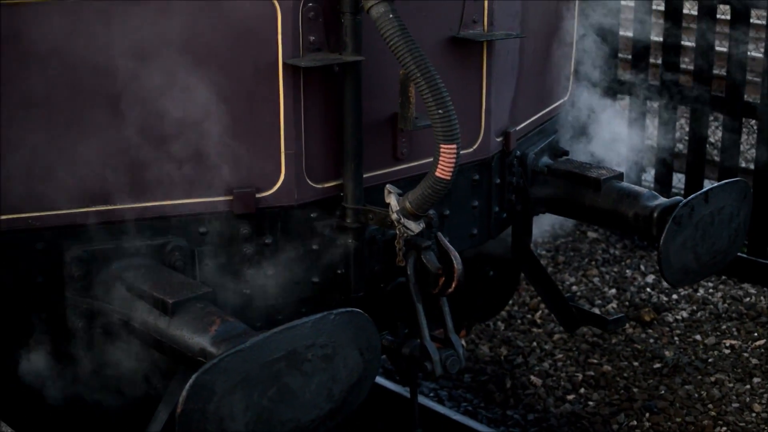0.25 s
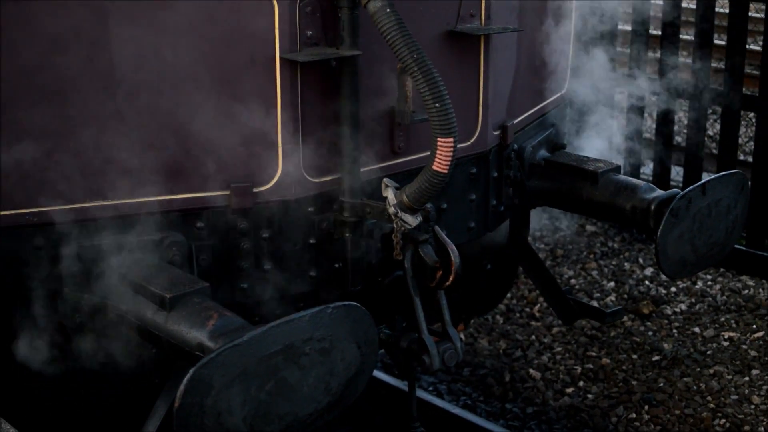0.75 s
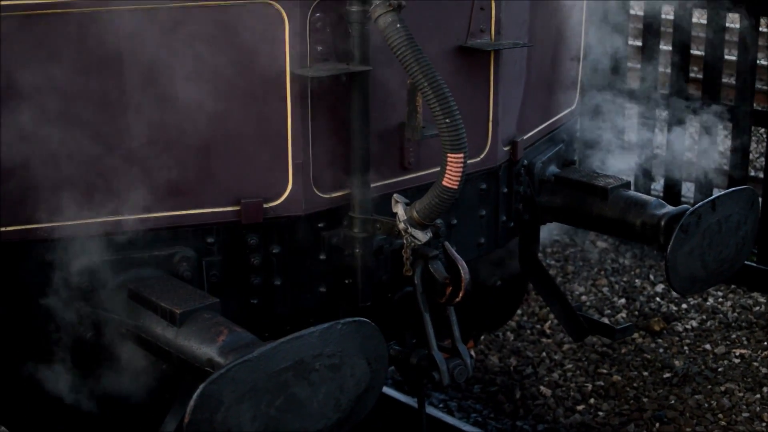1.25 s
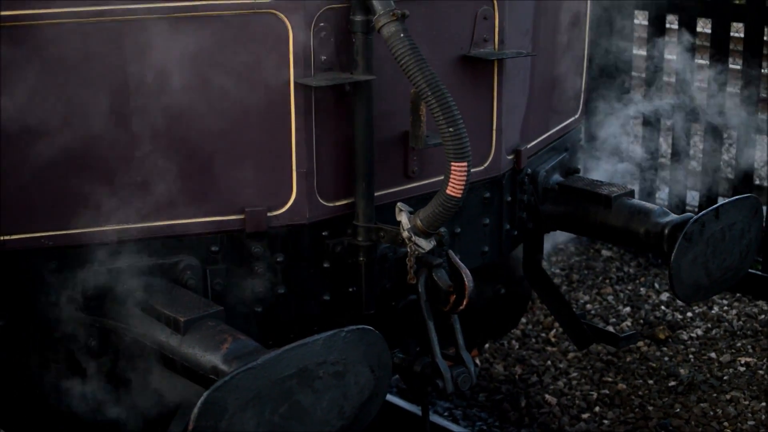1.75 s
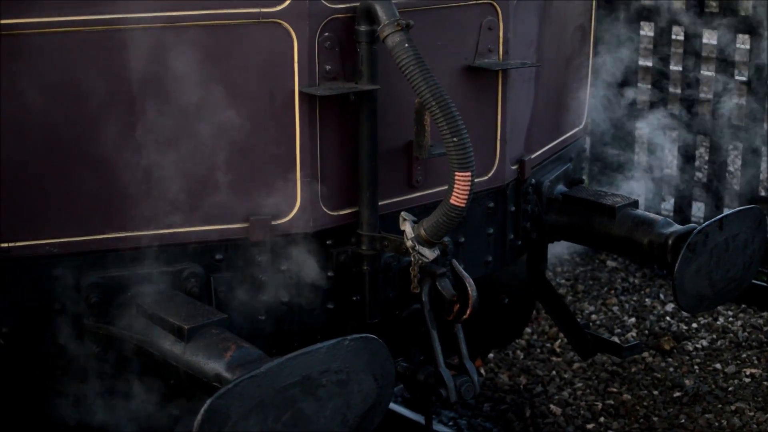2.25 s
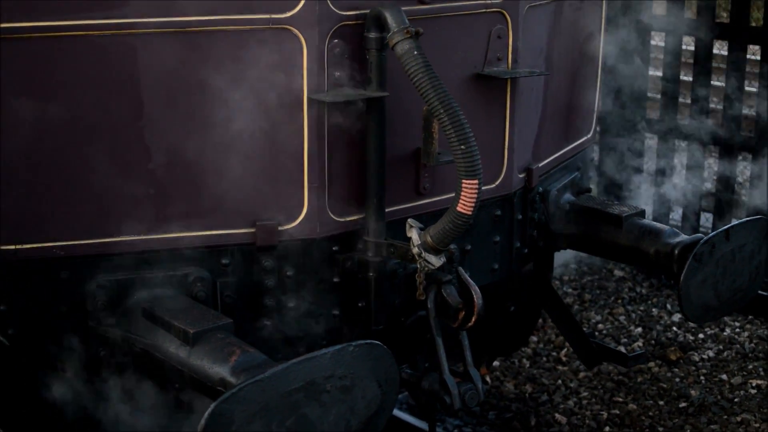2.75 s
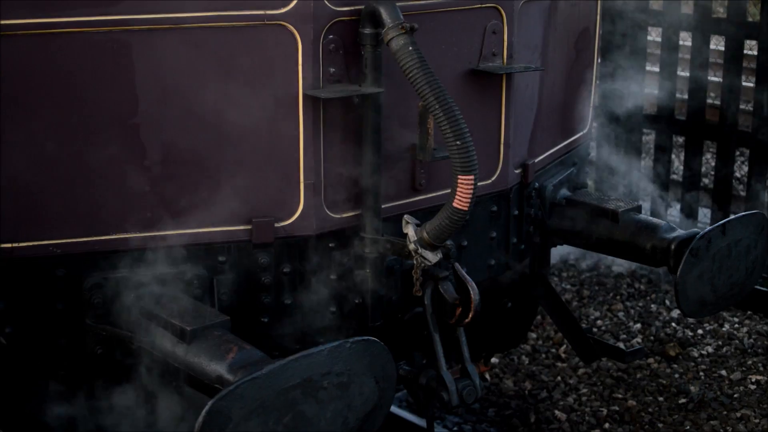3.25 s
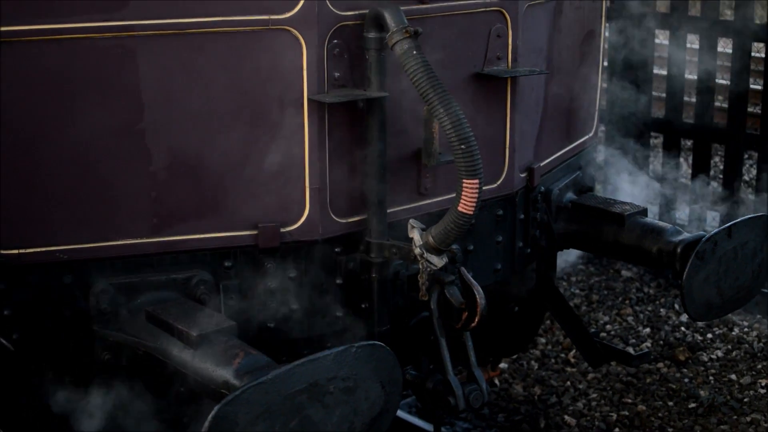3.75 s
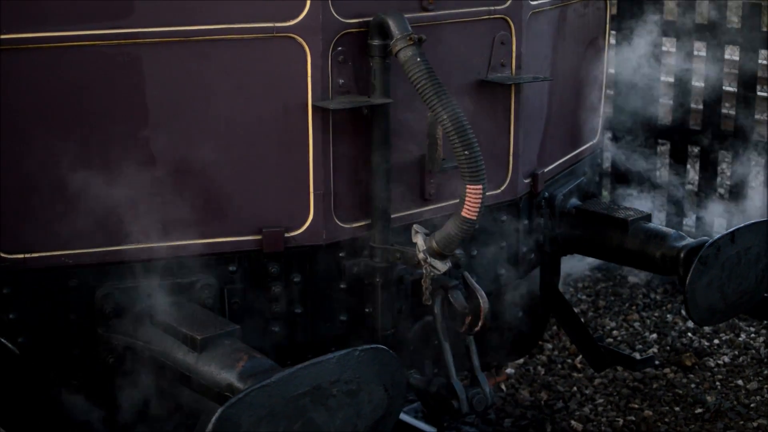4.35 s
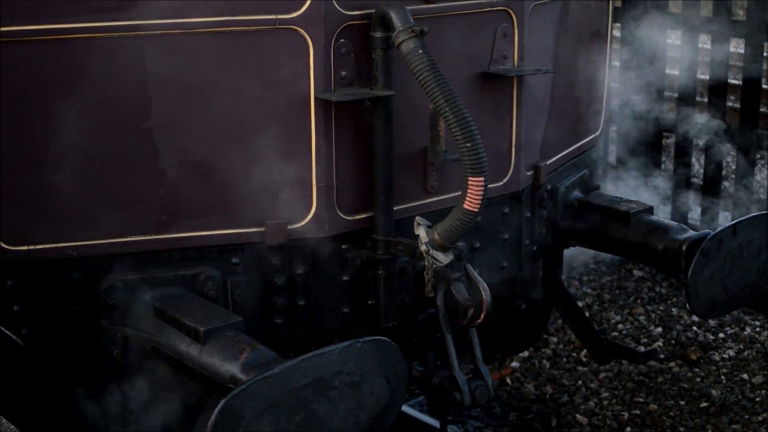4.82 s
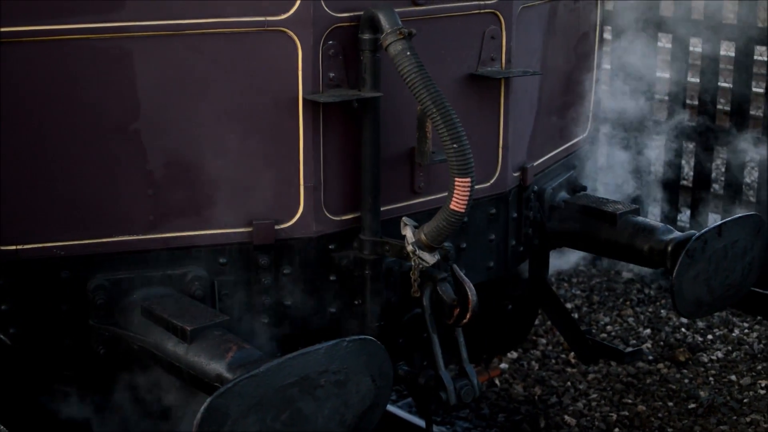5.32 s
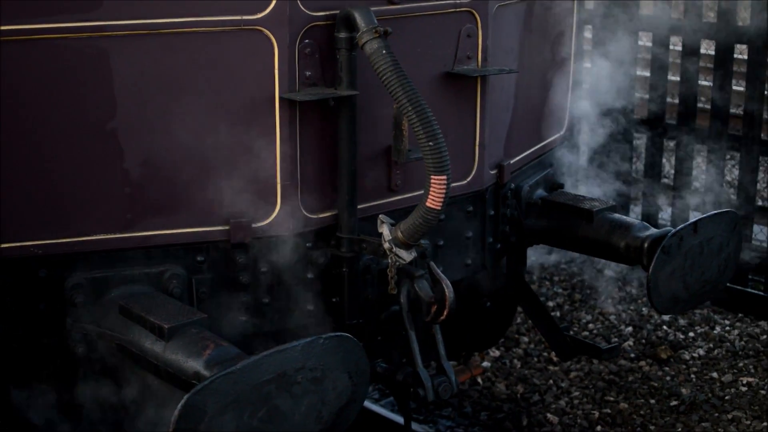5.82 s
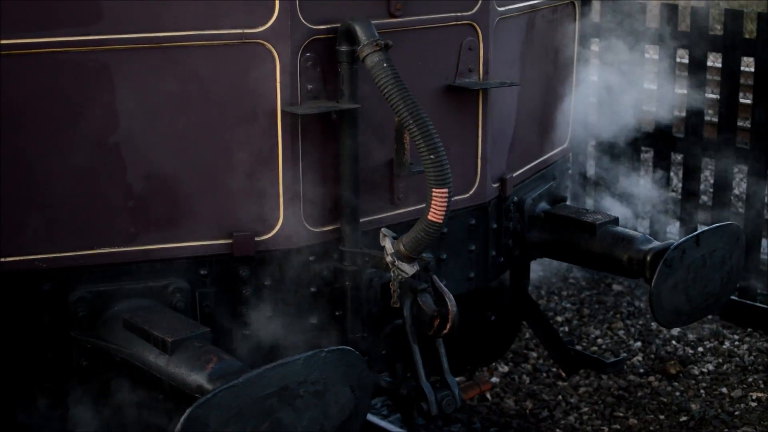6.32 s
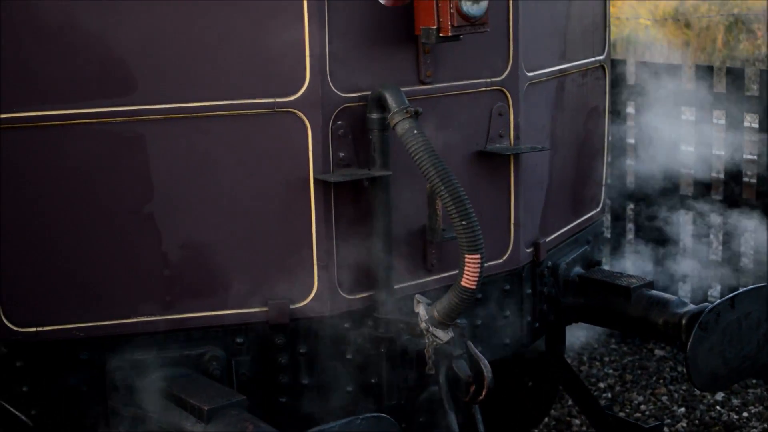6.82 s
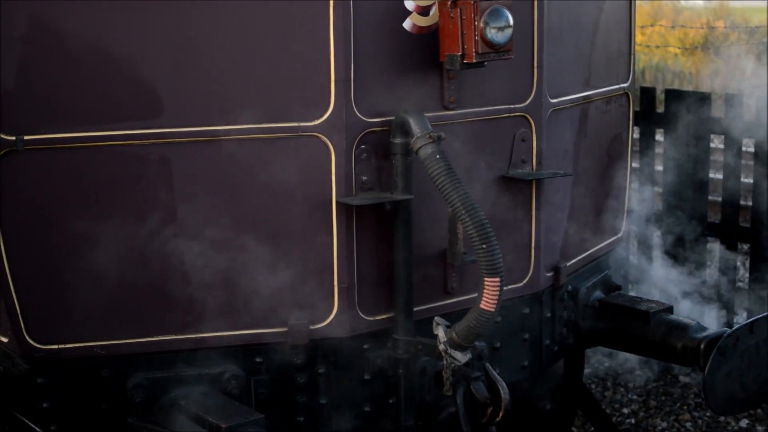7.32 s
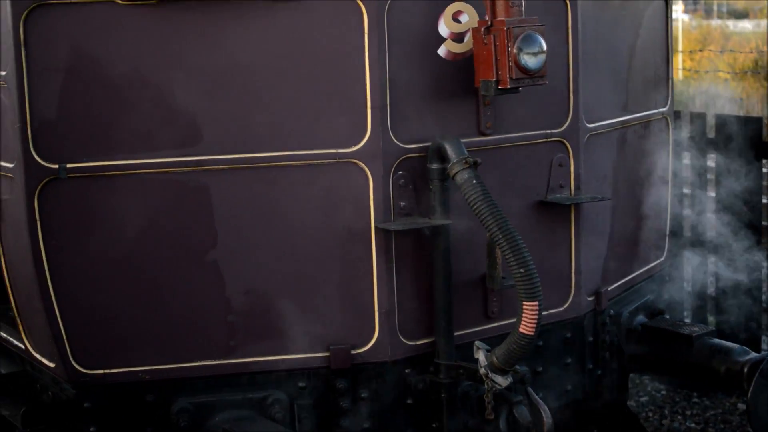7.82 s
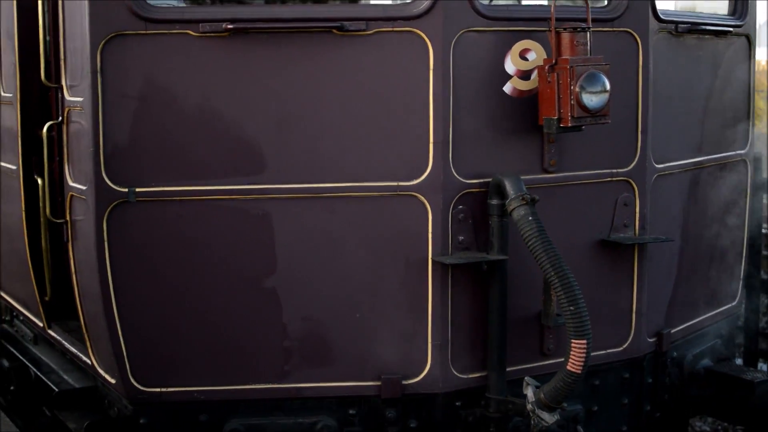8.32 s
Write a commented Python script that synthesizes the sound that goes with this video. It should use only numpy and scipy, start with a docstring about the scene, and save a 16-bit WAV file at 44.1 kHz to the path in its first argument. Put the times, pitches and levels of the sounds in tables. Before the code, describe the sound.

A steam locomotive stands at a station, close to the microphone. Its wet whistle first gives a hoarse, sputtering blow, then leaking steam swells into a steady hiss over a low drone, with occasional spits of water and dull boiler knocks. Midway the whistle cracks and clears into one short, loud, rising note that echoes far off while the hiss dips and recovers. Late on, a pipe clanks once as the hiss continues.

```python
"""Steam locomotive standing at a station

One microphone, close to the engine. Leaking steam hisses over a low drone and now and then spits water;
the boiler knocks dully, and late on a pipe clanks with water hammer. The wet whistle first only blows
hoarsely, later overblows, clears and sounds one rising note that echoes off far buildings and hillsides.
The mono recorder's gain control ducks the hiss under that note and lets it swell back."""
import sys
import numpy as np
from scipy import signal
from scipy.fft import rfft, irfft
from scipy.io import wavfile
from scipy.ndimage import uniform_filter1d, minimum_filter1d

SR = 44100
rng = np.random.default_rng(int(sys.argv[2]) if len(sys.argv) > 2 else 0)


def dump(signal):
    """Clip the signal to [-1, 1] and save it as 16-bit WAV at the path in sys.argv[1]."""
    limited = np.clip(np.atleast_2d(signal).T, -1, 1)
    pcm = np.round(limited * 32767).astype(np.int16)
    wavfile.write(sys.argv[1], SR, pcm)


N = 377937
T = np.arange(N) / SR
HZ = np.fft.rfftfreq(N, 1 / SR)

# The leak's spectrum from close by. Each row: frequency in Hz, relative level in dB.
STEAM_SPECTRUM = [(100, -17), (180, -7.5), (350, -10.5), (520, -10.5), (1100, -6), (2500, -6), (3300, -5),
                  (5500, -5), (8000, -6.5), (10000, -4.5), (12500, -12.5), (15500, -20)]
# Resonances of the pipes and frames around it. Each row: centre in Hz, width in Hz, gain in dB.
FRAME_RESONANCES = [(287.6, 69.4, 10.5), (792, 148, 7.5), (996, 74, 3.5), (1354, 64, 7.5), (1558, 144, 5.5),
                    (1845, 66, 7.5), (2254, 570, 5), (2927, 122, -9.5), (3011, 58, 10), (3423, 70, 4),
                    (3708, 153, 7.5), (4316, 53, 4.5), (4840, 56, 6.5), (5143, 73, 7), (6010, 260, 5.5),
                    (6830, 140, 5.5)]
# Where its roar, hiss and fizz lie. Each row: lower edge in Hz, upper edge in Hz.
LEAK_BAND_EDGES = [(900, 2700), (3200, 6500), (8000, 12000)]
# Where each of the three takes over from the band below. Each row: start in Hz, end in Hz.
LEAK_CROSSOVERS = [(350, 800), (2700, 3200), (6500, 8500)]
# The hiss is quieter under the hoarse blow and swells back near 0.9 s.
# In order: roar, hiss and fizz gain in dB until then.
EARLY_DIP_DB = (0, -5.5, -6.5)
# Slow drift of the leak, one table a band. Each row: time in seconds, gain in dB.
LOW_END_DRIFT = [(0, -20), (1.5, -18), (3, -16.8), (5.3, -18.5), (7.1, -14.5), (7.7, -19), (8.4, -19.5)]
ROAR_DRIFT = [(1, -31), (1.5, -26.5), (1.8, -29.5), (2.25, -26), (3, -27), (5.4, -28.5), (6.6, -28.5),
              (7, -26.5), (7.3, -30), (8.5, -29)]
HISS_DRIFT = [(.95, -20.5), (1.25, -22.5), (1.8, -20), (2.1, -22.2), (2.82, -19), (3.03, -23.5), (3.2, -21),
              (4.3, -19.5), (4.55, -23.5), (4.8, -19.5), (5.3, -22.5), (5.75, -20), (6.8, -23), (7.22, -19),
              (7.62, -22), (8.3, -21.2)]
FIZZ_DRIFT = [(1, -20), (1.45, -24), (1.8, -20.5), (2.2, -23.5), (3.1, -22.5), (4.3, -22.5), (5, -24.5),
              (5.55, -22.5), (6.15, -23), (7.5, -22.5), (8.55, -19)]
# The engine's low tones. Each row: frequency in Hz, level in dB before drift and surge.
DRONE_TONES = [(34, -59), (40.2, -41), (61, -48.5), (80.6, -40.5)]
# Slow drift of the drone. Each row: time in seconds, gain in dB.
DRONE_DRIFT = [(.72, -5.5), (.95, -0.5), (3.1, .7), (5, 0.5), (6.3, -0.5), (7.2, 1), (8.2, -4)]
# Steam through the waterlogged whistle. Each row: frequency in Hz, relative level in dB.
HOARSE_SPECTRUM = [(250, -19), (550, -13.5), (750, 1), (1200, -8), (1800, -9.5), (3300, -5), (5000, -16),
                   (9000, -13), (15000, -31)]
# Resonances of the waterlogged whistle. Each row: centre in Hz, width in Hz, gain in dB.
HOARSE_RESONANCES = [(765, 91, 8), (852, 32, 8.5), (1030, 54, 12.5), (1396, 130, 11), (1584, 70, 11.5),
                     (2073, 26, 14), (2480, 37, 10), (3010, 89, 11), (3350, 110, 8.5), (4370, 390, 9)]
# Harder puffs through it. Each row: start in seconds, length in seconds, level in dB, rasp gain in dB.
HOARSE_PUFFS = [(-.02, .11, -19.5, -7), (0.374, 0.017, -17.5, 1), (0.423, 0.013, -25, 7),
                (0.461, 0.087, -20, 6.5), (0.622, 0.068, -24.5, 4)]
# Returns from buildings and hillsides. Each row: delay in seconds, gain in dB.
FAR_ECHOES = [(.113, -18), (.372, -30), (.5, -42), (.65, -50), (1.372, -44), (1.62, -56), (2.13, -59)]
# Spits of wet steam. Each row: peak time in seconds, level in dB, half length in seconds, fizz in Hz.
WET_SPITS = [(0.662, -19, 0.016, 2380), (0.698, -18, 0.034, 9530), (3.265, -14, 0.014, 1490),
             (7.05, -18, .013, 2440), (7.067, -12, 0.014, 3870)]
# The spectrum they share. Each row: frequency in Hz, relative level in dB.
SPIT_SPECTRUM = [(60, -26), (280, 2.5), (550, -1), (1500, -4), (3000, 0), (7000, 0), (10000, 4),
                 (13500, -7), (15500, -27)]
# Knocks from the boiler. Each row: peak time in seconds, level in dB, pitch in Hz.
BOILER_KNOCKS = [(1.83, -31, 208), (2.08, -32, 130), (3.26, -29, 300), (5.68, -31, 220),
                 (6.371, -27.5, 217)]
# The whistle drops as it overblows, climbs with the heat and sags as the valve shuts.
# Each row: time in seconds, pitch in Hz.
WHISTLE_PITCH = [(3.48, 781), (3.56, 803), (3.59, 747.8), (3.69, 770), (3.85, 778), (4.016, 807.5),
                 (4.045, 778), (4.09, 700)]
# Its high overtones. Each row: multiple of the pitch, dB against the geometric mean of the two modes.
WHISTLE_OVERTONES = [(4, -17.5), (5, -23.5), (6, -29), (7, -20), (8, -27), (9, -26)]
# The steam jet that blows it. Each row: frequency in Hz, relative level in dB.
JET_SPECTRUM = [(100, -17), (300, -8), (550, -4), (750, 12), (1200, -3.5), (2800, -1), (3600, -4.5),
                (6000, -1), (8200, -3), (9700, 2.5), (12000, -6.5), (15500, -16)]
# Modes of a struck steam pipe. Each row: frequency in Hz, level in dB, seconds to fall by 60 dB.
PIPE_MODES = [(93, -13, 0.06), (250, -27, .05), (1430, -18, 0.09), (3400, -24, .07), (7350, -22, 0.061),
              (9500, -19, 0.069), (12800, -24, .11), (14100, -32, .06)]


def amp(db):
    """Decibels to gain."""
    return 10 ** (np.asarray(db) / 20)


def unit(x):
    """Scales to rms 1."""
    return x / np.sqrt(np.mean(x ** 2) + 1e-20)


def colour(points, resonances=()):
    """Gain at each frequency: a smooth slope with bell-shaped resonances, rolled off below 30 Hz."""
    hz, db = np.transpose(points)
    slope = np.interp(np.log(HZ + 1), np.log(hz), db)
    bells = sum(peak * 2 ** -((2 * (HZ - centre) / width) ** 2) for centre, width, peak in resonances)
    return amp(slope + bells) * HZ ** 3 / (HZ ** 3 + 30 ** 3)


def noise(gain):
    """Noise of rms 1 with the given colour."""
    return unit(irfft(rfft(rng.standard_normal(N)) * gain, N))


def wander(rate_hz):
    """Random drift of rms 1, up to about rate_hz changes a second."""
    return noise(1 / np.sqrt(1 + (HZ / rate_hz) ** 4))


def follow(points, t=T):
    """Joins (time, value) points with straight lines."""
    return np.interp(t, *np.transpose(points))


def ramp(start, length):
    """Rises from 0 to 1 in a straight line."""
    return np.clip((T - start) / length, 0, 1)


def swell(peak_s, half_length_s):
    """A bell-shaped rise and fall."""
    return np.exp(-((T - peak_s) / half_length_s) ** 2 / 2)


def leak(swells_back_s=0.902, rise_s=0.07, gust_db=0.74, flutter_db=0.6,
         eddy_db=2, eddy_s=0.021, eddy_hz=300):
    """Turbulent steam near the microphone, quieter at first; eddies brighten patches of its spectrum."""
    gain = colour(STEAM_SPECTRUM, FRAME_RESONANCES)
    hz, t, spectra = signal.stft(noise(gain), SR, nperseg=512, noverlap=384)
    early_dip = 1 - np.interp(t, T, ramp(swells_back_s - rise_s / 2, rise_s))
    shape_db = follow(LOW_END_DRIFT, t)
    bands = zip([ROAR_DRIFT, HISS_DRIFT, FIZZ_DRIFT], EARLY_DIP_DB, LEAK_BAND_EDGES, LEAK_CROSSOVERS)
    for drift, dip_db, (low, high), crossover in bands:
        power_share = np.sum(gain[(HZ > low) & (HZ < high)] ** 2) / np.sum(gain ** 2)
        band_db = follow(drift, t) + early_dip * dip_db - 10 * np.log10(power_share)
        shape_db = shape_db + np.interp(hz, crossover, [0, 1])[:, None] * (band_db - shape_db)
    eddies = rng.standard_normal(spectra.shape)
    for _ in range(2):
        eddies = uniform_filter1d(eddies, round(eddy_s / t[1]), axis=1)
        eddies = uniform_filter1d(eddies, round(eddy_hz / hz[1]), axis=0)
    spectra *= amp(shape_db + eddy_db * unit(eddies))
    steam = signal.istft(spectra, SR, nperseg=512, noverlap=384)[1][:N]
    return steam * amp(gust_db * wander(3.8) + flutter_db * wander(104))


def droplets(level_db=-33, per_s=400, spread_db=-1.0):
    """Drops of condensate burst in the leak as a fine crackle."""
    sizes = amp(spread_db * np.minimum(rng.exponential(1, N), 4)) * rng.choice([-1, 1], N)
    clicks = sizes * (rng.random(N) < per_s / SR)
    return amp(level_db) * unit(irfft(rfft(clicks) * colour(STEAM_SPECTRUM), N))


def engine_drone(waver=0.0067, throb_db=1, rumble_db=-44, surge_hz=1.0):
    """Low wavering engine tones in a soft rumble, with strong and weaker surges in turn."""
    tones = np.zeros(N)
    for hz, db in DRONE_TONES:
        level = amp(db + throb_db * wander(0.63))
        pitch = hz * (1 + waver * wander(4))
        tones += level * np.sin(2 * np.pi * np.cumsum(pitch) / SR)
    rumble = amp(rumble_db) * noise(colour([(30, 2), (70, -4.5), (130, -7.5), (400, -52), (2000, -90)]))
    cycle = 2 * np.pi * surge_hz * T
    surge_db = 1.1 * np.cos(cycle) + 2.2 * np.cos(2 * cycle)
    return (np.sqrt(2) * tones + rumble) * amp(follow(DRONE_DRIFT) + surge_db)


def puff(start, length, attack_s=0.012, release_s=0.023):
    """Attack, hold and dying release of a puff of steam."""
    return ramp(start, attack_s) * np.exp(-np.maximum(T - start - length, 0) / release_s)


def hoarse_blow(shut_off_s=0.694, trickle_db=-23, spray_db=-24, sputter_db=1.1, rasp_hz=2600):
    """Water in the whistle keeps it from speaking: only a sputtering hoot, with rasp and spray above."""
    steam = noise(colour(HOARSE_SPECTRUM, HOARSE_RESONANCES))
    hoot = irfft(rfft(steam) / (1 + (HZ / rasp_hz) ** 8), N)
    rasp = steam - hoot
    trickle = puff(0, shut_off_s)
    blow = amp(trickle_db) * trickle * (hoot + amp(-5.5) * rasp)
    for start, length, db, rasp_db in HOARSE_PUFFS:
        blow += amp(db) * puff(start, length) * (hoot + amp(rasp_db) * rasp)
    spray = amp(spray_db) * trickle * noise(1 / (1 + ((HZ - 9800) / 2300) ** 2))
    return blow * amp(sputter_db * wander(50)) + spray


def surroundings(source, station=(-27, 0.99), open_air=(-38, 6.3), smear_s=0.11, smear=0.055,
                 air_hz=2800):
    """A short station tail, a long open-air tail and single echoes, all dulled by distance."""
    taps = rng.standard_normal(N)
    response = np.zeros(N)
    for db, t60 in (station, open_air):
        tail = taps * amp(-60 * T / t60) * (T > .03)
        response += amp(db) * tail / np.linalg.norm(tail)
    for delay, db in FAR_ECHOES:
        scatter = taps * np.exp(-abs(T - delay) / smear_s) * (T > delay)
        response += amp(db) * smear * scatter / np.linalg.norm(scatter)
        response[round(delay * SR)] += amp(db)
    dulled = irfft(rfft(source) / (1 + (HZ / air_hz) ** 2), N)
    return signal.fftconvolve(dulled, response)[:N]


def spits(sputter_db=2, fizz_width_hz=650, fizz_db=9):
    """Slugs of water pass the leak in short broad bursts, each with a pitch of its own."""
    bursts = np.zeros(N)
    for peak_s, db, half_length_s, fizz_hz in WET_SPITS:
        fizz = noise(colour(SPIT_SPECTRUM, [(fizz_hz, fizz_width_hz, fizz_db)]))
        bursts += amp(db) * swell(peak_s, half_length_s) * fizz
    return bursts * amp(sputter_db * wander(150))


def boiler_knocks(half_length_s=0.022, half_width_hz=40):
    """Soft, hollow bumps from the boiler, each a narrow band of low noise."""
    return sum(amp(db) * swell(peak_s, half_length_s) * noise(1 / (1 + ((HZ - hz) / half_width_hz) ** 4))
               for peak_s, db, hz in BOILER_KNOCKS)


def mode_jump(at_s, jump_s=0.003):
    """A quick smooth step from 0 to 1, as a pipe changes its mode."""
    return .5 + .5 * np.tanh((T - at_s) / jump_s / 2)


def whistle(pull_s=3.448, overblow_s=3.592, clear_s=3.636, let_go_s=4.009,
            jitter=0.003, wet_jitter=0.0109):
    """The pipe is weak and ragged while wet, overblows to its third partial, then clears and speaks."""
    valve = ramp(pull_s, .155) * (1 - ramp(let_go_s, .076))
    flow = valve ** 1.6
    overblown, clear = mode_jump(overblow_s), mode_jump(clear_s)
    wet = 1 - overblown
    drying_s = np.maximum(T - clear_s, 0)
    # As the pipe heats and dries, fundamental and octave grow; third partial and jet fade (dB a second).
    fundamental = amp(18.5 + 5 * drying_s) * flow * (amp(-13) * wet * flow + clear)
    octave_ratio = amp(-31 + 33 * drying_s) * flow ** 0.56
    third = amp(13.5 - 55 * drying_s) * flow * (amp(-28) * wet + overblown)
    jet_db = 5.5 - 29 * drying_s + 0.5 * (1 - clear)  # a little more hiss while it carries water
    pitch = follow(WHISTLE_PITCH) * (1 + (jitter + wet_jitter * wet) * wander(106))
    phase = 2 * np.pi * np.cumsum(pitch) / SR
    shaken = phase + 0.066 * wander(150)  # turbulence blurs the high partials most
    overtones = sum(amp(db + 2.5 * wander(28.9)) * np.sin(k * shaken) for k, db in WHISTLE_OVERTONES)
    note = fundamental * (np.sin(phase) + octave_ratio * np.sin(2 * shaken)) * amp(wander(9.4))
    note += third * np.sin(3 * phase) * amp(2.5 * wander(50))
    settled = 1 - np.exp(-drying_s / 0.024)
    note += np.sqrt(fundamental * third) * overtones * settled  # the two pipe modes mix in the jet
    jet = flow * noise(colour(JET_SPECTRUM, [(1900, 210, -4), (4060, 300, 1)]))
    return np.sqrt(2) * note + jet * amp(jet_db + 1.4 * wander(99))


def water_hammer(strike_s=7.056, rise_s=0.0017, rattle_db=2):
    """A slug of water strikes a steam pipe: a thud with a thin, rattling ring of metal."""
    age = np.maximum(T - strike_s, 0)
    ring = sum(amp(db - 60 * age / t60) * np.sin(2 * np.pi * hz * age) for hz, db, t60 in PIPE_MODES)
    return ring * (1 - np.exp(-age / rise_s)) * amp(rattle_db * wander(200))


def scene():
    """At the microphone: the engine close by; only the whistle is loud enough to come back from afar."""
    call = whistle() + hoarse_blow()
    engine = leak() + droplets() + engine_drone() + spits() + boiler_knocks() + water_hammer()
    mono = engine + call + surroundings(call)
    return np.array([mono, mono])


def record(dry, limit_db=-5, attack_s=0.047, hold_s=0.069, recovery_db_per_s=58, top_hz=15750):
    """The recorder ducks on peaks, holds and recovers; what slips past clips, then the top is cut off."""
    peak_db = -minimum_filter1d(-20 * np.log10(abs(dry[0]) + 1e-9), size=441)  # loudest within 10 ms
    pole = np.exp(-1 / (attack_s * SR))
    over_db = signal.lfilter([1 - pole], [1, -pole], np.maximum(peak_db - limit_db, 0))
    hold_samples = 2 * int(hold_s * SR / 2) + 1
    held_db = -minimum_filter1d(-over_db, hold_samples, origin=hold_samples // 2)
    recovery_db = recovery_db_per_s * T
    cut_db = np.maximum.accumulate(held_db + recovery_db) - recovery_db
    ducked = np.clip(dry * amp(-cut_db), -1, 1)
    lowpass = signal.firwin(511, top_hz, window=("kaiser", 9), fs=SR)
    return signal.oaconvolve(ducked, lowpass[None], "same")


dry = scene()
out = record(dry)
dump(out)
```